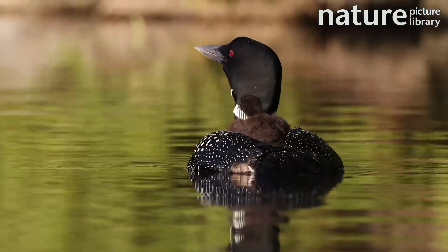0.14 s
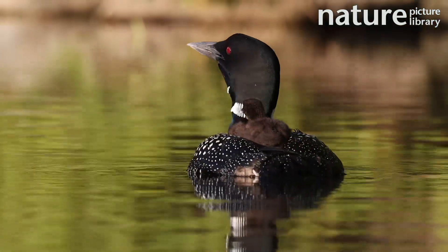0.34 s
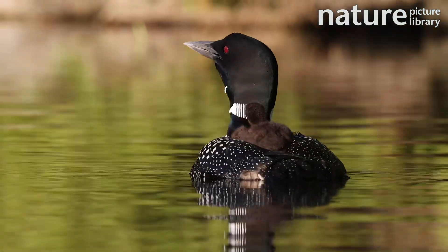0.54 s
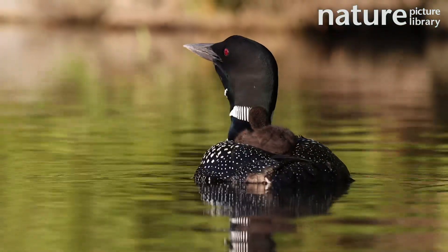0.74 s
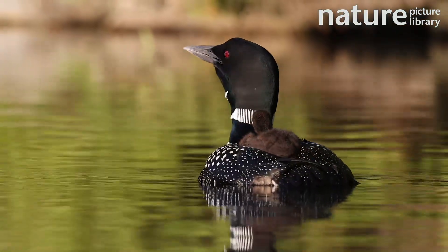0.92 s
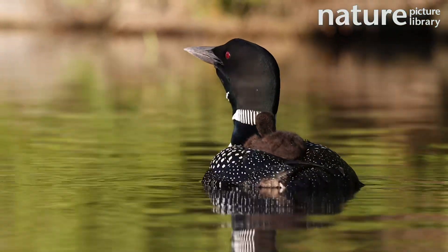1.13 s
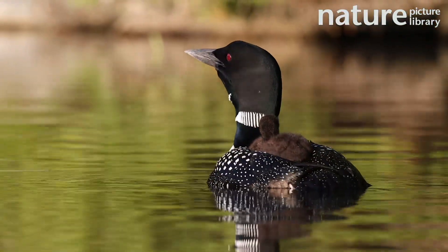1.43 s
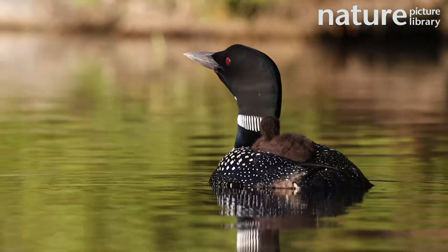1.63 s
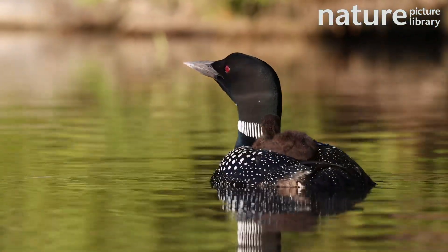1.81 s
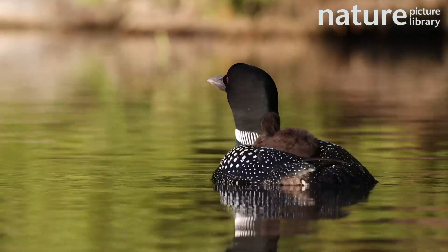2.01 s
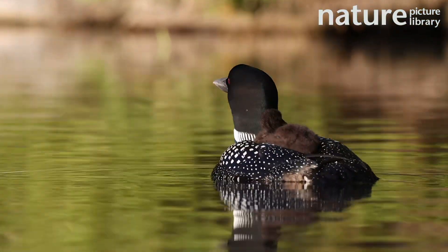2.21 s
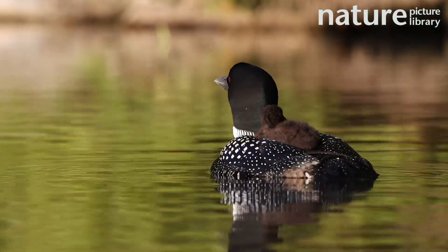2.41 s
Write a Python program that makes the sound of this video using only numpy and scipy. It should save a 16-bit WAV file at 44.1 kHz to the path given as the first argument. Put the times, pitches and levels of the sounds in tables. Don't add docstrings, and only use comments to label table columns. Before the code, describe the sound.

One loud, flute-like loon wail climbs, holds and falls, its echo lingering over a calm lake; far birds trill and whistle before and after a quick hoot, with faint outdoor hiss, microphone on the bank.

```python
import sys
import numpy as np
from scipy import signal
from scipy.fft import rfft, irfft
from scipy.io import wavfile
from scipy.ndimage import uniform_filter1d

SR = 44100
rng = np.random.default_rng(int(sys.argv[2]) if len(sys.argv) > 2 else 0)


def voltage_ratio(level):
    return 10 ** (np.asarray(level, float) / 20)


def wav_record(signal):
    frames = np.transpose(np.atleast_2d(signal))
    bounded = np.clip(frames, -1, 1)
    quanta = np.round(bounded * 32767).astype(np.int16)
    wavfile.write(sys.argv[1], SR, quanta)


N = 112454


def rms_one(x):
    return x / np.sqrt(np.mean(x ** 2) + 1e-20)


def drift(rate):
    r = np.exp(-80 * np.pi * rate / SR)
    slow = signal.lfilter([1], [1, -2 * r, r * r], rng.standard_normal(N // 40 + 2002))[2000:]
    return np.interp(np.arange(N) / 40, np.arange(len(slow)), rms_one(slow))


def band(low_hz, high_hz):
    sos = signal.butter(2, [low_hz, high_hz], "band", fs=SR, output="sos")
    return rms_one(signal.sosfilt(sos, rng.standard_normal(N)))


def scatter(x, t60_s, build_s):
    t = np.arange(N) / SR
    tail = rng.standard_normal(N) * voltage_ratio(-60 * t / t60_s) * np.clip((t - .01) / build_s, 0, 1)
    return signal.fftconvolve(x, tail / np.sqrt(np.sum(tail ** 2)))[:N]


def glide(start_s, length_s, from_hz, to_hz, db):
    u = np.clip((np.arange(N) / SR - start_s) / length_s, 0, 1)
    phase = 2 * np.pi * length_s * (from_hz * u + (to_hz - from_hz) * u ** 2 / 2)
    return voltage_ratio(db) * np.sqrt(2) * np.sin(np.pi * u) * np.sin(phase)


def throat_overtones(pitch, phase):
    # centre in Hz, width in Hz, gain in dB.
    throat = [(1830, 40, -10.0), (5190, 200, -28.0), (5900, 130, 9.0), (6900, 400, -12.0), (8450, 350, 8.0),
              (9000, 120, -14.0)]
    lag = .9
    waves = []
    for k in range(1, 17):
        gain_db = sum(peak_db * np.exp(-((k * pitch - centre) / width) ** 2)
                      for centre, width, peak_db in throat)
        waves.append(np.cos(k * phase + lag * k ** 2) * voltage_ratio(gain_db))
    return waves


def register_gates(registers):
    edge_s, sag_from_s, sag_blend_s = .006, 1.25, .3
    t = np.arange(N) / SR
    starts = [rows[0][0] for rows in registers]
    ends = [rows[-1][0] for rows in registers]
    gates = []
    for before, start, end, after in zip([-1] + ends, starts, ends, starts[1:] + [N / SR]):
        times = [max(before, start - edge_s), start, end, min(after, end + edge_s)]
        gates.append(np.interp(t, times, [0, 1, 1, 0]))
    top = np.interp(t, [ends[1], starts[2], ends[3], starts[4]], [0, 1, 1, 0])
    sagging = np.clip((t - sag_from_s) / sag_blend_s, 0, 1)
    gates[2:4] = top * (1 - sagging), top * sagging
    return gates


def loon():
    # time in seconds, pitch in Hz, level in dB, overtone lift from the open bill in dB.
    low = [(0.0, 374, -28, 5.5), (0.028, 393, -31.5, 5), (.08, 414.3, -28, 0.5), (0.13, 439, -25.5, -3.5),
           (.18, 463.8, -25.5, -9.5), (0.212, 481, -21, -12.5)]
    middle = [(.222, 570.4, -18, -5), (.29, 578.4, -16.5, 0.5), (.35, 586.5, -14, -0.5),
              (.44, 598, -16, 0.5), (.485, 605.8, -14, 0.5), (.625, 624, -10, -3.5), (.68, 633.7, -10, -2),
              (.706, 648, -18, 1.5), (.72, 673.5, -16.5, 1)]
    last = [(1.677, 588.8, -17, -1.5), (1.7, 578, -15, -2.5), (1.72, 562, -22, -1.5),
            (1.748, 558.5, -23, -2), (1.76, 559.6, -27.5, -20.5), (1.8, 567, -51, -28.5),
            (1.88, 573.2, -47, -21), (1.91, 557.5, -61, -22)]
    hoot = [(2.196, 440, -38, 4), (2.208, 500, -31, 3), (2.22, 648, -22, -3), (2.243, 676, -15.5, 0),
            (2.265, 670, -19.5, -1), (2.278, 652, -15.5, -7), (2.285, 632, -20, -15)]
    hoot_fall = [(2.289, 497, -33, -5), (2.305, 400, -37, -8), (2.325, 340, -56, 0)]
    # time in seconds, level in dB, overtone lift in dB.
    high = [(.724, -13, -2.5), (.77, -12.5, -0.5), (.86, -12, -1), (.94, -13, -1), (1.02, -10.5, -1),
            (1.11, -11.5, -0.5), (1.2, -11, -1.5), (1.27, -11, -1), (1.32, -12, 1.5)]
    sag = [(1.36, -11, 0), (1.405, -9.5, -1), (1.45, -12.5, 1.5), (1.49, -8.5, -0.5), (1.54, -13, 1.5),
           (1.572, -17.5, 4), (1.595, -12, -7), (1.64, -15, -4), (1.672, -15.5, -7)]
    # time in seconds, pitch in Hz.
    top_pitch = [(.72, 772), (.8, 772), (.96, 780), (1.2, 778.5), (1.35, 772), (1.4, 768.5), (1.5, 753.5),
                 (1.6, 737), (1.672, 727)]
    # multiple of the pitch [1], level in dB.
    low_tones = [(1, -2), (2, -5.5), (3, -32.5), (4, -48.5)]
    middle_tones = [(1, 1), (2, -22.5), (3, -44.5), (4, -41.5), (5, -41), (6, -45.5), (7, -45), (8, -48.5),
                    (9, -62.5), (10, -60), (11, -64), (12, -66), (13, -70), (14, -69.5), (15, -65.5),
                    (16, -71)]
    high_tones = [(1, 1), (2, -37.5), (3, -41.5), (4, -35.5), (5, -34.5), (6, -46.5), (7, -57.5),
                  (8, -53.5), (9, -66), (10, -53), (11, -62.5), (12, -49), (13, -56.5), (14, -60),
                  (15, -67), (16, -65)]
    sag_tones = [(1, 0.5), (2, -53.5), (3, -42), (4, -38.5), (5, -41), (6, -42.5), (7, -60), (8, -73),
                 (9, -63.5), (10, -55.5), (11, -63.5), (12, -64.5), (13, -67), (14, -71.5), (15, -78.5),
                 (16, -67)]
    last_tones = [(1, -0.5), (2, -20.5), (3, -35.5), (4, -60.5), (5, -44), (6, -50), (7, -47.5), (8, -50.5)]
    hoot_tones = [(1, -0.5), (2, -10.5), (3, -38.5), (4, -30.5), (5, -34), (6, -61)]
    fall_tones = [(1, -2), (2, 3.5), (3, -13), (4, -20)]
    waver, shimmer_db, fade_in_s = .0004, 1.5, .0015

    high, sag = ([(s, np.interp(s, *np.transpose(top_pitch)), db, lift) for s, db, lift in rows]
                 for rows in (high, sag))
    registers = [low, middle, high, sag, last, hoot, hoot_fall]
    tones = [low_tones, middle_tones, high_tones, sag_tones, last_tones, hoot_tones, fall_tones]

    t = np.arange(N) / SR
    s, hz, db, lift = np.concatenate(registers).T
    pitch = np.interp(t, s, hz)
    effort = np.interp(t, s, db)
    bill = np.interp(t, s, lift)
    phase = 2 * np.pi * np.cumsum(pitch * (1 + waver * drift(25))) / SR
    waves = throat_overtones(pitch, phase)
    shimmer = [0] + [(bill + shimmer_db * drift(21)) * (0.8 + 0.18 * k) for k in range(15)]

    voice = np.zeros(N)
    for gate, register_tones in zip(register_gates(registers), tones):
        for k, (_, tone_db) in enumerate(register_tones):
            voice += gate * voltage_ratio(effort + tone_db + shimmer[k]) * np.sqrt(2) * waves[k]
    return voice * np.clip(t / fade_in_s, 0, 1)


def shore(voice):
    # delay in seconds, level in dB.
    banks = [
        (.02, -19),
        (.04, -20.5),
        (.06, -22),
        (.085, -37),
        (.15, -37),
        (.21, -33),
        (.32, -35.5),
    ]
    t = np.arange(N) / SR
    dull = signal.sosfilt(signal.butter(2, 6900, fs=SR, output="sos"), voice)
    slaps = sum(voltage_ratio(db) * np.interp(t - delay_s, t, dull, left=0) for delay_s, db in banks)
    haze = voltage_ratio(-23.5) * scatter(dull, t60_s=.8, build_s=.02)
    far = voltage_ratio(-34.5) * scatter(dull, t60_s=3.5, build_s=.25)
    earlier_wail = voltage_ratio(-54) * band(770 - 12, 770 + 6)
    return slaps + earlier_wail + haze + far


def trill_bird():
    start_s, gap_s, note_s = 1.652, .0922, 0.032
    high_hz, low_hz, level_db = 5323, 5005, -54.5
    trill = np.zeros(N)
    for k in range(10):
        note_db = level_db + rng.normal(0, 1) - 4.3 * (k == 0)
        trill += glide(start_s + k * gap_s, note_s, high_hz, low_hz, note_db)
    return trill


def thrush():
    # start in seconds, length in seconds, from pitch in Hz, to pitch in Hz, level in dB.
    whistles = [(.01, .02, 3300, 3250, -64), (.053, .018, 3400, 3300, -67), (.51, .08, 3340, 3410, -55),
                (.58, .06, 3270, 3000, -59), (1.968, .1, 3800, 3820, -49.5), (2.05, .16, 3780, 3660, -58),
                (2.3, .14, 4050, 3450, -61), (2.15, .11, 3930, 3950, -54), (2.18, .1, 3700, 3700, -53),
                (2.265, .075, 3700, 3710, -47.5), (2.35, .06, 3700, 3670, -56),
                (2.27, .055, 4050, 4550, -65), (2.31, .065, 4600, 4630, -59), (2.39, .06, 4630, 4620, -62),
                (2.325, .05, 2290, 2310, -61), (2.36, .065, 2310, 2630, -60),
                (2.435, .045, 3450, 3750, -58), (2.435, .09, 3130, 3170, -56), (2.44, .08, 2680, 3000, -58),
                (2.495, .08, 2900, 3450, -52), (2.08, .09, 6150, 6200, -73)]
    flutter_db, flutter_delay_s = 2.0, .00003
    song = sum(glide(*row) for row in whistles) * voltage_ratio(flutter_db * drift(48))
    song = signal.resample(song, 2 * N)
    t = np.arange(N) / SR
    return np.interp(t + flutter_delay_s * drift(42), np.arange(2 * N) / (2 * SR), song)


def buzz_bird():
    start_s, rise_s, decay_s, level_db = 2.125, 0.015, 0.6, -60.5
    age = np.arange(N) / SR - start_s
    envelope = np.clip(age / rise_s, 0, 1) * np.exp(-age / decay_s)
    return voltage_ratio(level_db + 2 * drift(35.3)) * envelope * band(3520, 5500)


def songbirds():
    trill = trill_bird()
    song = thrush()
    leaves = signal.butter(2, 3280, "high", fs=SR, output="sos")
    scattered = scatter(signal.sosfilt(leaves, .4 * trill + song), t60_s=0.32, build_s=0.079)
    return trill + song + buzz_bird() + voltage_ratio(0.5) * scattered


def frog():
    # start in seconds, length in seconds, pitch in Hz, level in dB.
    grunts = [
        (1.42, 0.053, 162, -50),
        (1.51, 0.035, 160, -46),
        (1.545, .045, 166.2, -49),
    ]
    return sum(glide(start_s, length_s, hz, hz, db) for start_s, length_s, hz, db in grunts)


def drip():
    # start in seconds, level in dB.
    start_s, level_db = (.103, -53)
    decay_s = .002
    age = np.arange(N) / SR - start_s
    return voltage_ratio(level_db) * (age > 0) * np.exp(-np.abs(age) / decay_s) * band(1900, 5000)


def air():
    # frequency in Hz, level in dB.
    colour = [(20, -13.5), (60, -2), (200, -4.5), (500, -10.5), (1200, -17.5), (4000, -22.5), (7000, -29),
              (16000, -28)]
    rumble_hz, rumble_db = 62, -60
    points_hz, points_db = np.transpose(colour)
    hz = np.fft.rfftfreq(N, 1 / SR) + 1
    tilt = voltage_ratio(np.interp(np.log(hz), np.log(points_hz), points_db))
    hiss = irfft(rfft(rng.standard_normal(N)) * tilt, N)
    rumble = voltage_ratio(rumble_db + 0.66 * drift(4.6)) * band(rumble_hz * 0.081, rumble_hz * 1.5)
    return voltage_ratio(-55) * rms_one(hiss) + rumble


def scene():
    voice = loon()
    return (voice + shore(voice) + songbirds() + frog() + drip() + air())[None]


def top_cut(x):
    return signal.sosfilt(signal.butter(12, 16500, fs=SR, output="sos"), x)


def record(dry):
    mask_from_hz, mask_db, patch_db = 4800, -74, 5.0
    hz, _, z = signal.stft(dry[0], SR, nperseg=1024)
    loudest = uniform_filter1d(np.abs(z).max(axis=0), size=5)
    patches = uniform_filter1d(rng.standard_normal((len(hz) // 12 + 1, z.shape[1])), size=9) * 3
    limit = loudest * voltage_ratio(mask_db + patch_db * np.repeat(patches, 12, axis=0)[:len(hz)])
    near = uniform_filter1d(np.abs(z), size=3, axis=0)
    spared = (near > limit) | (hz[:, None] < mask_from_hz)
    kept = signal.istft(z * spared, SR, nperseg=1024)[1][None, :N]
    mix = signal.sosfilt(signal.cheby2(16, 40, 15900, fs=SR, output="sos"), kept)
    return top_cut(mix)


dry = scene()
out = record(dry)
wav_record(out)
```